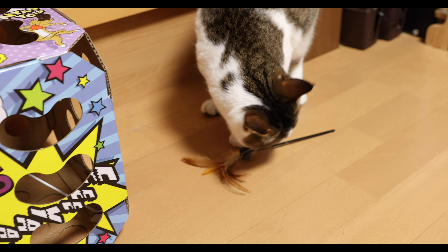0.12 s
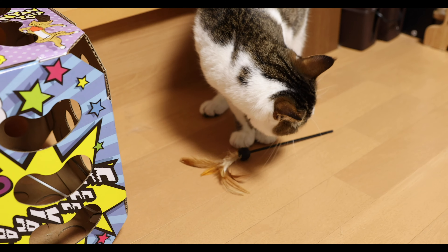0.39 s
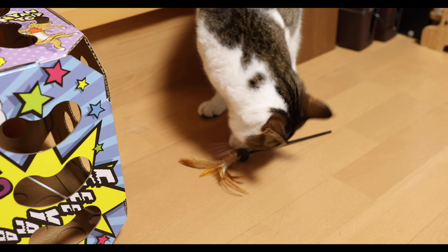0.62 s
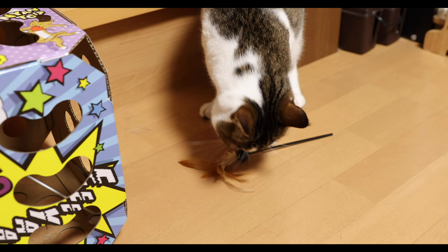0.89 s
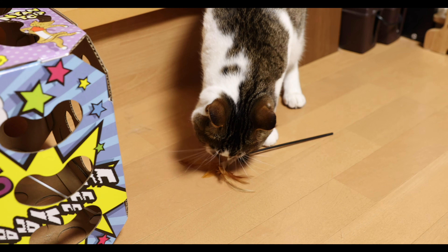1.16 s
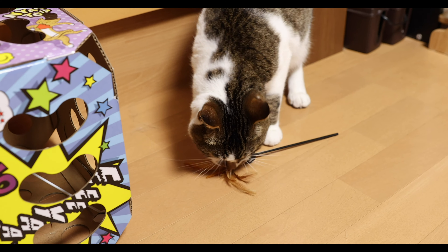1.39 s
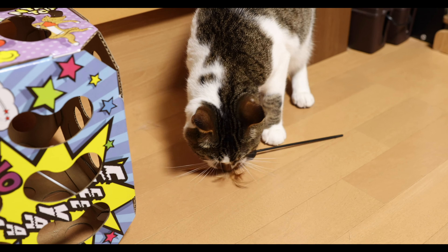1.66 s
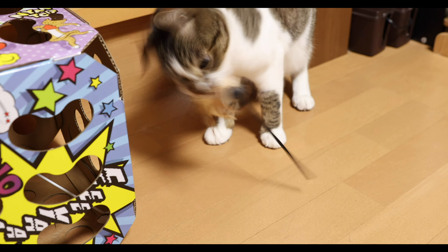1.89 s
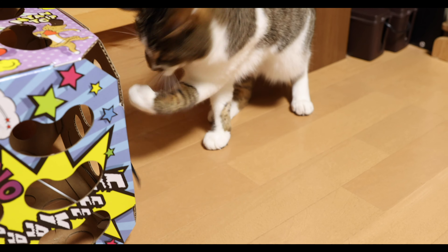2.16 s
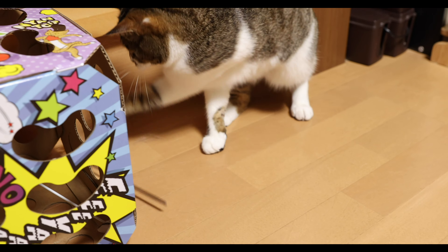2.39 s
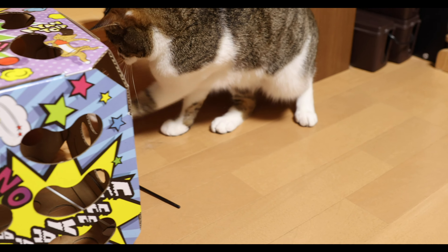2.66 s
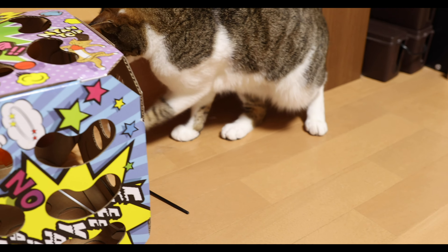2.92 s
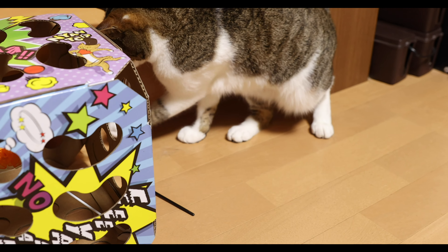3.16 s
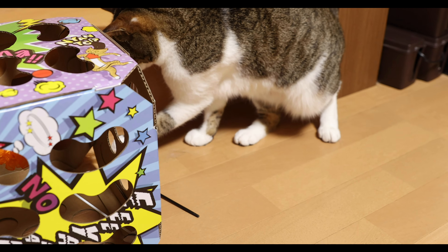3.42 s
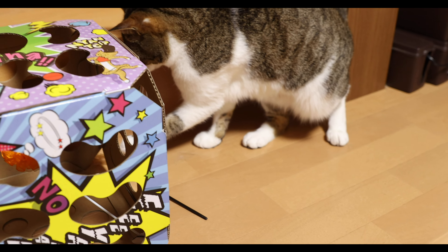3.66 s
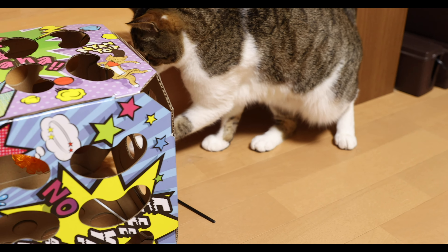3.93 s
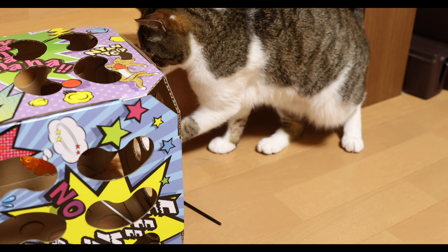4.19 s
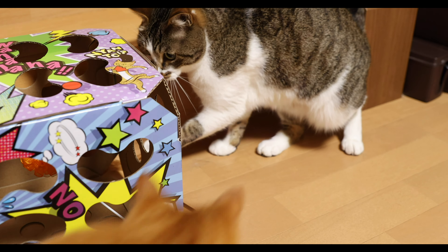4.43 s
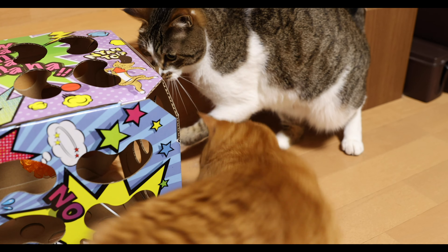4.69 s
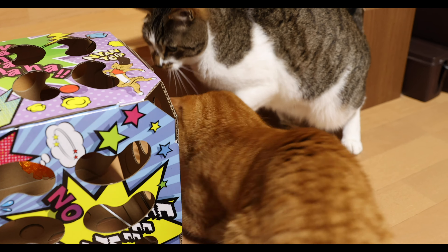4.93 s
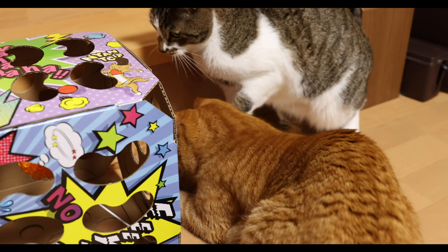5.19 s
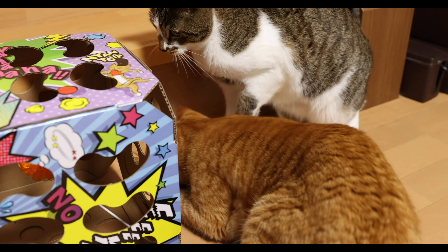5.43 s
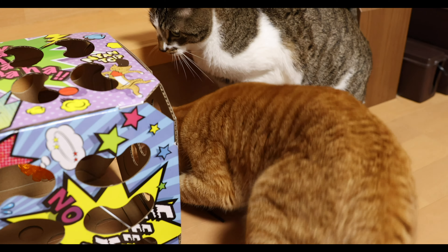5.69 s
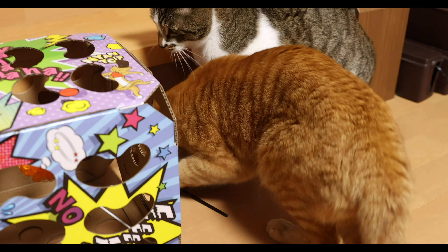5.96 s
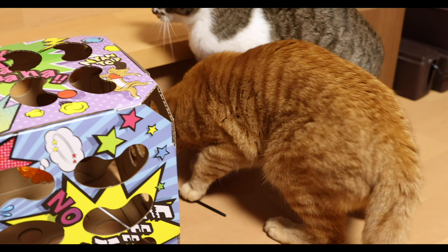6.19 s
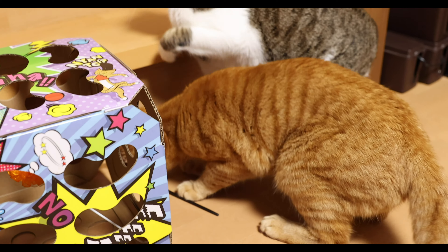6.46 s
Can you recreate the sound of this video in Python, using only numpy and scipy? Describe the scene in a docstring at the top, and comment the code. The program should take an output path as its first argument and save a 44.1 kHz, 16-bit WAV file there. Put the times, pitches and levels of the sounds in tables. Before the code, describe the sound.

Quiet room; cats bat a feather wand, a loud burst of clattering cardboard raps and sharp wand ticks, then sparser knocks and soft thumps.

```python
"""A quiet room with a wooden floor, where cats bat a feather wand about a cardboard box.
Short bursts of chatter ring box, boards and wand; swelling sine cycles make low thumps and box raps.
Filtered noise makes the scrapes of fur and claw and one duller hiss; ringing noise makes bright ticks.
Sparse echoes give the room a short tail; shaped noise and faint wandering tones lie under it all,
heard by two close microphone ports."""
import sys
import numpy as np
from scipy import signal
from scipy.fft import rfft, irfft
from scipy.io import wavfile
from scipy.ndimage import uniform_filter1d

SR = 44100
rng = np.random.default_rng(int(sys.argv[2]) if len(sys.argv) > 2 else 0)


def level_to_linear(level):
    """Convert decibel levels to linear amplitude factors, elementwise."""
    exponent = np.asarray(level, float) / 20
    return 10 ** exponent


def transcribe(u):
    """Save the signal u as a 16-bit wav file named by the first command-line argument.

    u: samples, shape (n,) or (channels, n), limited to [-1, 1]; the rate is SR.
    q: integer samples, one column per channel.
    """
    v = np.clip(np.atleast_2d(u).T, -1, 1)
    q = np.round(v * 32767).astype(np.int16)
    wavfile.write(sys.argv[1], SR, q)


N = 290178

# Blows of wand and paw. Each row: start in seconds, strength in dB, hardness in dB per octave,
# how far the box hollow joins in dB, how far the wand joins in dB.
BLOWS = [(0.641, -59.5, -8, 18, -1), (0.756, -47, -8.5, 4, 14), (0.835, -47, -8.5, 8, 11),
         (0.86, -49, -10, 3, -4), (1.377, -49.5, -9, 4.5, -5), (1.578, -58, -7, 17, -.5),
         (1.674, -28, -10.5, -2, 10), (2.042, -23.5, 2, 4.5, 0), (2.1295, -14, 2.5, -8.5, 6),
         (2.217, -11, -1, -3.5, 5.5), (2.2776, -23, -13, -34, -6), (2.3999, -18.5, 0.5, 3, 7),
         (2.433, -13.5, 0.5, -10, 11.5), (2.515, -26.5, -2, 0, 16), (2.565, -22.5, -4, -6, 7.5),
         (4.544, -42.5, -1, 12, 7), (4.708, -46.5, 0, 14, -1.5), (4.752, -22, -4, -15, -14),
         (5.069, -27.5, -4.5, -5, -21.5), (5.411, -17, -3, -7, -2.5), (6.237, -49, -7, -28, -8),
         (6.248, -49, -10, 16, 2)]
# The wand's end raps the box wall once, cleanly. Each row: start in seconds, peak in dB, pitch in Hz.
RAPS = [(1.6742, -33, 696), (1.6855, -42, 905), (2.0425, -39, 515), (2.217, -10, 715), (2.4008, -8.5, 1380),
        (2.4344, -4, 1061), (2.515, -13, 1070), (2.563, -13, 1150), (2.587, -12, 1055),
        (2.622, -15.5, 1040), (2.6395, -23.5, 1032), (2.65, -17, 1080), (4.7267, -16, 1000),
        (4.7325, -17, 1090), (4.7605, -18, 980), (5.0805, -20.5, 900), (5.411, -20, 800)]
# Strokes of fur and claw, and one duller hiss after a blow. Each row: start in seconds, length in seconds,
# hiss level in dB and box wall level in dB (both before the rise and easing), brightness in dB per octave.
STROKES = [(1.728, 0.08, -44, -56, 3), (2.436, 0.14, -24.5, -44, -9.5), (4.724, 0.091, -35.5, -29.5, 4),
           (4.789, 0.07, -38.5, -61, 7), (5.062, 0.088, -41.5, -36, 10), (5.258, 0.11, -44, -51, 11.5),
           (5.706, 0.11, -52.5, -51.5, 1.5), (6.222, 0.063, -56, -35.5, -8.5)]
# Low thumps: soft landings, and the low body of a blow. Each row: start in seconds,
# peak in dB ahead of the bass cut, pitch in Hz, number of cycles.
LOW_THUMPS = [(0.028, -43, 105, 3.4), (0.259, -43.5, 107, 4.5), (0.368, -43.5, 78, 3.2),
              (1.596, -42, 111, 3.2), (2.214, -34.5, 133, 2), (2.399, -13.5, 295, 1.96),
              (2.721, -46, 110, 4.3), (2.854, -42.5, 119, 4.1), (3.057, -40.5, 113.6, 4.2),
              (3.609, -47, 113, 8.3), (3.949, -44, 98.7, 3.6), (4.078, -36, 108, 3.3),
              (4.121, -39.5, 97.6, 2.4), (4.531, -31, 202, 2.5), (4.543, -22.5, 143, 2.1),
              (4.609, -46.5, 163, 1.7), (4.731, -31.5, 131, 1.5), (4.864, -32, 90, 3),
              (5.348, -34.5, 113, 3.4), (5.379, -49, 97, 2.5), (5.902, -49, 145, 5.7),
              (5.989, -36.5, 82, 3), (6.18, -46.5, 150.5, 9.5), (6.26, -43, 94, 3.1)]
# Bright ticks, and the sharp cracks of some blows. Each row: start in seconds, peak in dB, centre in Hz.
BRIGHT_TICKS = [(0.639, -45.5, 7800), (0.672, -48, 7800.0), (0.752, -45, 7140), (0.774, -48, 7800.0),
                (0.83, -41, 8250), (0.856, -48, 7800.0), (1.266, -49, 6000.0), (1.348, -41.5, 6100),
                (1.403, -41, 6600), (1.659, -37, 6260), (1.6605, -35, 4200), (1.6746, -38, 6400),
                (1.7523, -23, 6160), (2.114, -31, 7800.0), (2.253, -20, 6100), (2.2779, -6.5, 6700),
                (2.295, -16, 5630), (2.357, -26, 7600), (2.441, -14, 9970), (2.582, -11, 8800),
                (2.585, -10.5, 5300), (2.599, -27, 6500), (2.646, -21, 7850), (2.681, -29, 5870),
                (4.732, -23, 5360), (4.751, -18.5, 6500.0), (4.809, -33, 6500), (4.769, -31, 6500),
                (5.211, -46.5, 8600), (5.405, -38, 8500.0), (6.051, -48.5, 6500.0), (6.244, -45, 7300),
                (6.266, -43, 7900), (6.299, -47.5, 6600.0), (6.336, -44.5, 7780)]

# Resonances of the box wall. Each row: pitch in Hz, width in Hz, relative level in dB.
WALL_MODES = [(697, 142, -2.5), (900, 137, 6), (1077, 122, 7), (1157, 470, -2)]
# Resonances of the box hollow. Each row: pitch in Hz, width in Hz, relative level in dB.
HOLLOW_MODES = [(242, 150, -3), (469, 308, 8)]
# Resonances of the board. Each row: pitch in Hz, width in Hz, relative level in dB.
BOARD_MODES = [(1700, 740, -3.36), (2015, 180, 1.5), (2400, 650, -9.5)]
# Resonances of the wand. Each row: pitch in Hz, width in Hz, relative level in dB.
WAND_MODES = [(2730, 1380, 4), (3612, 675, 2), (4310, 1100, -0.5)]
# Resonances of the crack of a blow. Each row: pitch in Hz, width in Hz, relative level in dB.
CRACK_MODES = [(5130, 790, 6), (6500, 290, 7.5), (7650, 1900, -2), (11300, 4600, -16)]
# How fast the chatter dies, for hollow, wall, board, wand and crack. Each entry: decay time in seconds.
CONTACT_TIMES = [0.0093, 0.010, 0.014, 0.0041, 0.0027]
# The first touch of a blow against the chatter, for the same five parts. Each entry: a plain factor.
FIRST_TOUCHES = [6.2, 7.7, 16, 1.4, 7.6]
# How hardness tilts board, wand and crack. Each row: octaves above the wall, offset in dB.
TILT_ABOVE_WALL = [(1.05, 0.5), (1.9, -0.5), (2.8, 2.5)]

# Colour of fur against card. Each row: frequency in Hz, relative level in dB per Hz.
FUR_COLOUR = [(300, -42), (900, -7.5), (2500, 9), (4500, 4), (8000, -6.5), (11000, -22.5), (16000, -39)]
# How long the room rings. Each row: frequency in Hz, time to fall by 60 dB in seconds.
ROOM_DECAY = [(200, 0.65), (700, 0.41), (1500, 0.5), (4000, 0.58), (7000, 0.37), (11000, 0.2)]
# A distant appliance. Each row: pitch in Hz, width in Hz, level in dB.
HUM_TONES = [(113, 23.3, -70), (602.5, 3.9, -64), (1452, 6.6, -68)]
# Colour of the hush. Each row: frequency in Hz, relative level in dB per Hz.
HUSH_COLOUR = [(22, -6), (42, -42), (62, -43), (75, -2), (110, -3.5), (160, -4), (270, 0.5), (500, -4),
               (1400, -9.5), (2500, -15.5), (6000, -25), (10000, -27), (15700, -28), (15900, -84)]
# The part of the hush that differs between the ports. Each row: frequency in Hz,
# level against the common part in dB.
PORT_DIFFERENCE = [(60, -9), (150, -18.5), (380, -25.5), (950, -24), (2380, -13), (5980, -2.5),
                   (15000, -0.5)]


def evened(x):
    """Brings a sound to an rms of one."""
    return x / np.sqrt(np.mean(x ** 2) + 1e-20)


def peaked(x):
    """Brings a sound to a peak of one."""
    return x / np.max(np.abs(x))


def read(points, hz):
    """Reads a curve between its points, along log frequency."""
    f, value = np.transpose(points)
    return np.interp(np.log(hz + 1), np.log(f + 1), value)


def add(mix, s, sound):
    """Lays a sound into the mix at s seconds."""
    part = mix[round(s * SR):][:len(sound)]
    part += sound[:len(part)]


def ring(x, modes, detune=1):
    """Passes x twice through each resonance, for steep flanks; neighbours in opposite sign."""
    out = np.zeros(len(x))
    for k, (hz, width, db) in enumerate(modes):
        b, a = signal.iirpeak(hz * detune, hz / max(width, 2), SR)
        once = signal.lfilter(b, a, x)
        out += (-1) ** k * level_to_linear(db) * signal.lfilter(b, a, once)
    return out


def knocks():
    """A blow is a few milliseconds of chatter that sets five parts ringing; harder blows favour the higher ones."""
    rattle_db, rattle_s, rattles_per_s = -3, 0.021, 1500  # the loose wand clatters on after a blow
    out, t = np.zeros(N), np.arange(4096) / SR
    shape = len(BLOWS), 4096
    chatter, strays = rng.standard_normal(shape), rng.uniform(-1.17, 1, (len(BLOWS), 5))
    hits = rng.standard_normal(shape) * (rng.random(shape) < rattles_per_s / SR)
    rattle = level_to_linear(rattle_db) * hits * np.exp(-t / rattle_s)
    parts = HOLLOW_MODES, WALL_MODES, BOARD_MODES, WAND_MODES, CRACK_MODES
    for blow, noise, blow_strays, loose in zip(BLOWS, chatter, strays, rattle):
        s, strength_db, hardness, hollow_db, wand_db = blow
        board_db, shaft_db, crack_db = (hardness * octaves + db for octaves, db in TILT_ABOVE_WALL)
        shares_db = hollow_db, 0, board_db, shaft_db + wand_db, crack_db
        for db, modes, contact, first, stray in zip(shares_db, parts, CONTACT_TIMES, FIRST_TOUCHES, blow_strays):
            force = np.r_[first, noise[1:]] * np.exp(-t / contact)
            force = force + loose * (modes is WAND_MODES)
            ringing = ring(force, modes, 1 + 0.056 * stray)  # each part's pitch strays a little at random
            add(out, s, level_to_linear(strength_db + db) * peaked(ringing))
    return out


def bounces(spread=0):
    """A single touch: a few cycles of one pitch, set by the wand's free length, strayed by up to about spread
    octaves."""
    cycles, skew = 4.53, 0.56  # a skew below one swells early and fades late
    out = np.zeros(N)
    for (s, db, hz), stray in zip(RAPS, rng.uniform(-0.92, 1, len(RAPS))):
        hz = hz * 2 ** (spread * stray)
        u = np.arange(round(cycles / hz * SR)) * hz / SR / cycles
        swell = np.sin(np.pi * u ** skew) ** 2
        add(out, s, level_to_linear(db) * peaked(swell * np.sin(2 * np.pi * cycles * u)))
    return out


def scrapes():
    """Strokes crackle in strands over dense grains and shake the box wall."""
    rise_share, rise_db = 0.31, -12.5  # the stroke digs in over this share of its length
    hiss_fade_db, wall_fade_db = -31, -61  # fall per whole length of easing
    dull_hz, snap_db, snaps_per_s = 5000, 15.5, 700  # easing loses treble; single fibres snap
    out = np.zeros(N)
    for stroke, (noise, size) in zip(STROKES, rng.standard_normal((len(STROKES), 2, 8192))):
        s, length, hiss_db, wall_db, bright = stroke
        t = np.arange(0, length, 1 / SR)[:8192]
        dig_db = rise_db * np.clip(1 - t / length / rise_share, 0, 1) ** 2
        easing = np.clip(t / length - rise_share, 0, 1)
        grain_db = 2.5 * evened(uniform_filter1d(size, 90))
        grains = (noise * level_to_linear(grain_db))[:len(t)]
        snaps = (rng.random(8192) < snaps_per_s / SR)[:len(t)]
        grains = grains * (1 + level_to_linear(snap_db) * snaps)

        hz = np.fft.rfftfreq(len(t), 1 / SR)
        colour = level_to_linear(read(FUR_COLOUR, hz) + bright * np.log2(hz + 500))
        crackle = 2.2 * grains + evened(strands())[:len(t)]
        hiss = irfft(rfft(crackle) * colour, len(t))
        dull = signal.sosfilt(signal.butter(2, dull_hz, fs=SR, output="sos"), hiss)
        hiss = dull + (hiss - dull) * np.clip(1 - 1.7 * easing, 0, 1) ** 2

        sound = level_to_linear(hiss_db + hiss_fade_db * easing ** 1.08) * evened(hiss)
        sound += level_to_linear(wall_db + wall_fade_db * easing ** 1.66) * evened(ring(grains, WALL_MODES))
        add(out, s, level_to_linear(dig_db) * sound * signal.windows.tukey(len(t), 0.1))
    return out


def strands(count=14):
    """Fibres catch and let go: narrow hisses at scattered pitches, each flaring in its own patches."""
    low_hz, high_hz, sharpness, flare_db, flare_s = 3310, 14000, 23, 5.5, 0.034
    noise, flares = rng.standard_normal((2, count, 8192))
    pitches = np.geomspace(low_hz, high_hz, count) * rng.uniform(0.933, 1.084, count)
    span = round(flare_s * SR)
    out = np.zeros(8192)
    for x, flare, hz in zip(noise, flares, pitches):
        patches = evened(uniform_filter1d(uniform_filter1d(flare, span), span))
        strand = ring(x * level_to_linear(flare_db * patches), [(hz, hz / sharpness, 0)])
        out += evened(strand) * np.sqrt(hz)
    return out


def thumps():
    """A soft, low push: a few low cycles that swell and fade."""
    out = np.zeros(N)
    for s, db, hz, cycles in LOW_THUMPS:
        u = np.arange(round(cycles / hz * SR)) * hz / SR / cycles
        swell = np.sin(np.pi * u ** 0.54)
        add(out, s, level_to_linear(db) * peaked(swell * np.sin(2 * np.pi * cycles * u)))
    # a steep cut below 67 Hz keeps the thumps free of deep bass
    return signal.sosfilt(signal.butter(4, 67, "high", fs=SR, output="sos"), out)


def ticks():
    """Short dry clicks: dying noise through three bright resonances around each centre."""
    out, t = np.zeros(N), np.arange(1024) / SR
    for (s, db, hz), noise in zip(BRIGHT_TICKS, rng.standard_normal((len(BRIGHT_TICKS), 1024))):
        modes = [(0.62 * hz, 0.57 * hz, -3), (hz, 0.37 * hz, 3), (1.63 * hz, 0.37 * hz, -5)]
        click = ring(noise * np.exp(-t / 0.0022), modes)
        add(out, s, level_to_linear(db) * peaked(click))
    return out


def room(strokes):
    """Four fresh draws of the blows, each with its own echoes, make a smooth tail."""
    out = np.zeros(N)
    for draw in range(4):
        sent = knocks() + ticks() + level_to_linear(1) * bounces(spread=0.82) + level_to_linear(3) * strokes
        out += echoes(sent)
    return level_to_linear(-9.5) * out / 2  # halved, as four unlike tails add up to double


def echoes(x):
    """Sparse echoes of random sign, each band dying at its own speed."""
    first_echo_s = 0.006
    taps = np.zeros(SR // 2 + 20)
    slots = np.arange(round(first_echo_s * SR), SR // 2, 20)
    taps[slots + rng.integers(0, 20, len(slots))] = rng.choice([-1., 1.], len(slots))
    hz, age, z = signal.stft(taps, SR, nperseg=256)
    decay = level_to_linear(-60 * age / read(ROOM_DECAY, hz)[:, None])
    tail = signal.istft(z * decay, SR, nperseg=256)[1]
    return signal.fftconvolve(x, tail / np.linalg.norm(tail))[:N]


def hums():
    """Faint tones whose phase takes a random walk, which spreads each over its width."""
    out, t = np.zeros(N), np.arange(N) / SR
    walks = np.cumsum(rng.standard_normal((len(HUM_TONES), N)), 1)
    for (hz, width, db), walk in zip(HUM_TONES, walks):
        phase = 2 * np.pi * hz * t + np.sqrt(2 * np.pi * width / SR) * walk
        out += level_to_linear(db) * np.sqrt(2) * np.sin(phase)
    return out


def hush():
    """Air and far machines, common to both ports, plus hiss in opposite sign; the bass comes in lumps."""
    frames, hz = N // 512 + 5, np.fft.rfftfreq(2048, 1 / SR)
    a, b, c, d, patches = rng.standard_normal((frames, 1025, 5)).T
    patches = uniform_filter1d(uniform_filter1d(patches, 10, 0), 5, 1)
    patches = np.tanh(evened(patches))
    lumpy_db = 7.4 / (1 + hz / 300)
    common = a + 1j * b
    apart = level_to_linear(read(PORT_DIFFERENCE, hz))[:, None] * (c + 1j * d)
    colour = level_to_linear(read(HUSH_COLOUR, hz)[:, None] + lumpy_db[:, None] * patches)
    z = np.array([common + apart, common - apart]) * colour
    both = signal.istft(z, nperseg=2048, noverlap=1536)[1][:, :N]
    return level_to_linear(-51) * both / np.std(both.mean(0))


def scene():
    """Close sounds, their room tails, and the steady bed beneath."""
    thud, strokes = thumps(), scrapes()
    close = knocks() + ticks() + bounces() + strokes + thud
    tails = room(strokes) + level_to_linear(-12.5) * echoes(thud)
    return close + tails + hums() + hush()


def roll_off(x):
    """The treble ends steeply here."""
    return signal.sosfilt(signal.butter(12, 16530, fs=SR, output="sos"), x)


def record(dry):
    """Peaks beyond full scale are clipped flat."""
    mix = np.clip(dry, -1, 1)
    return roll_off(mix)


dry = scene()
out = record(dry)
transcribe(out)
```